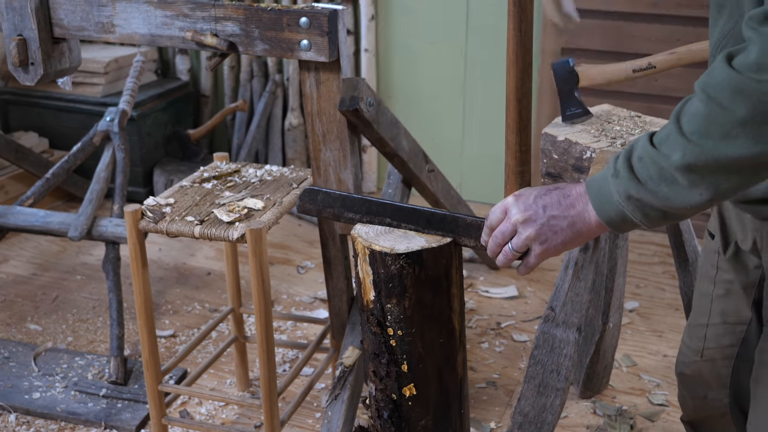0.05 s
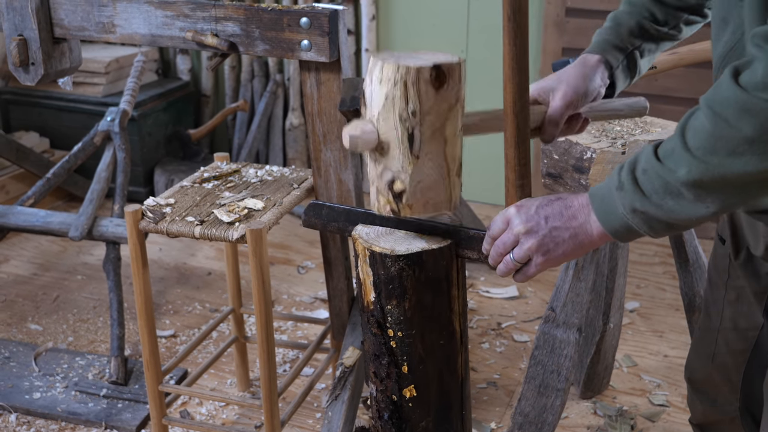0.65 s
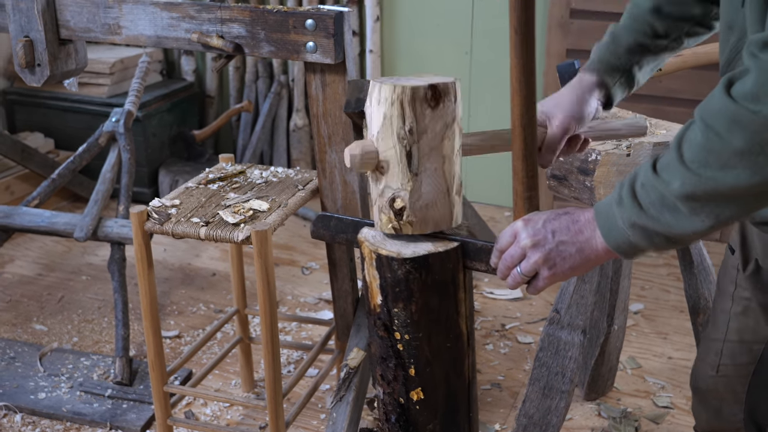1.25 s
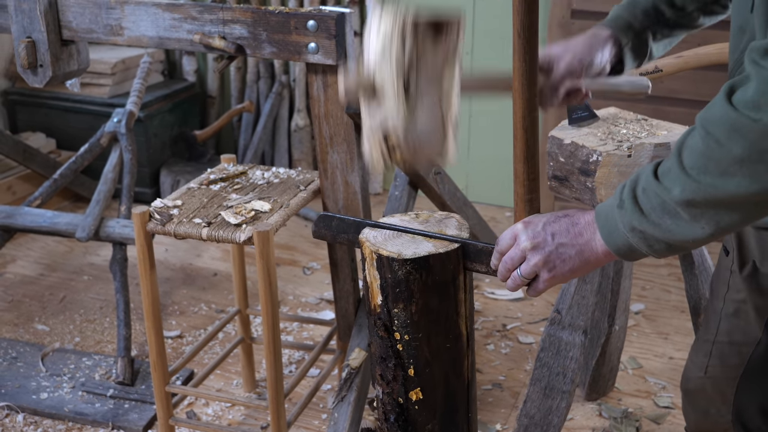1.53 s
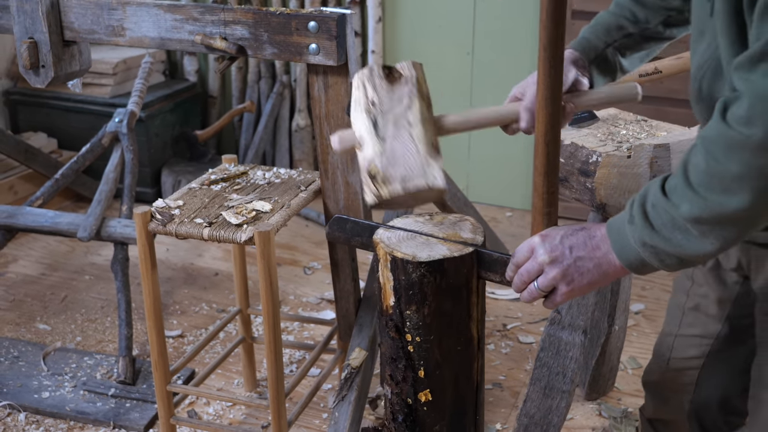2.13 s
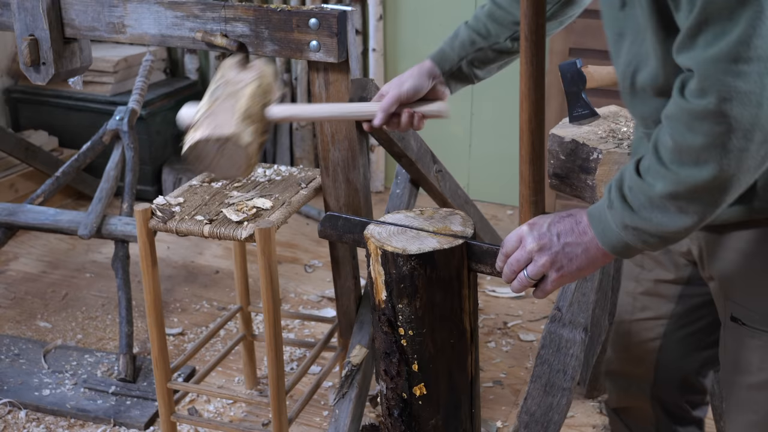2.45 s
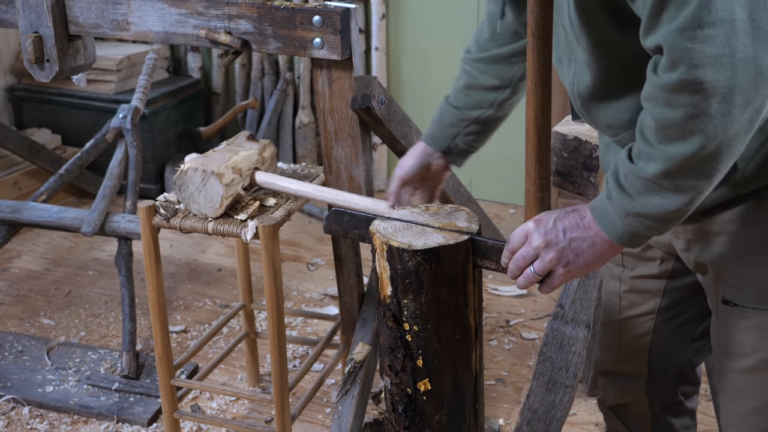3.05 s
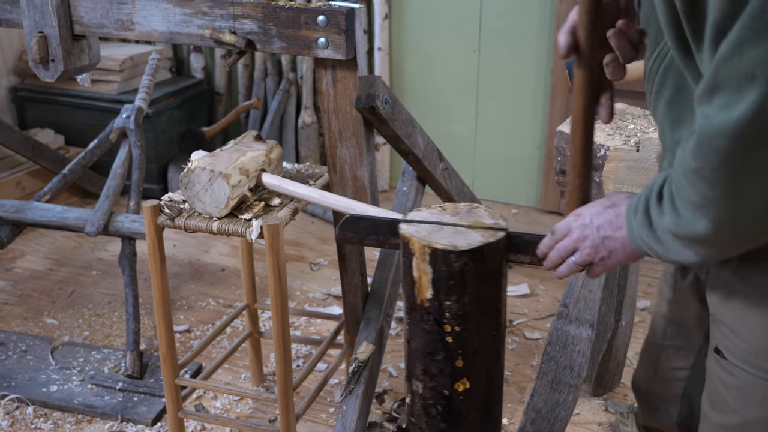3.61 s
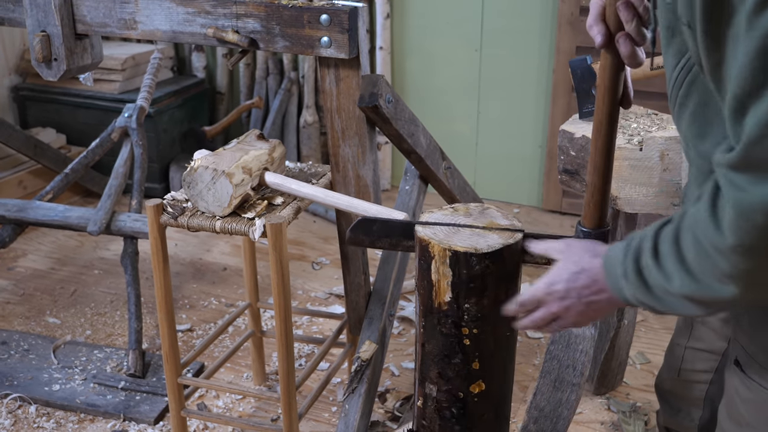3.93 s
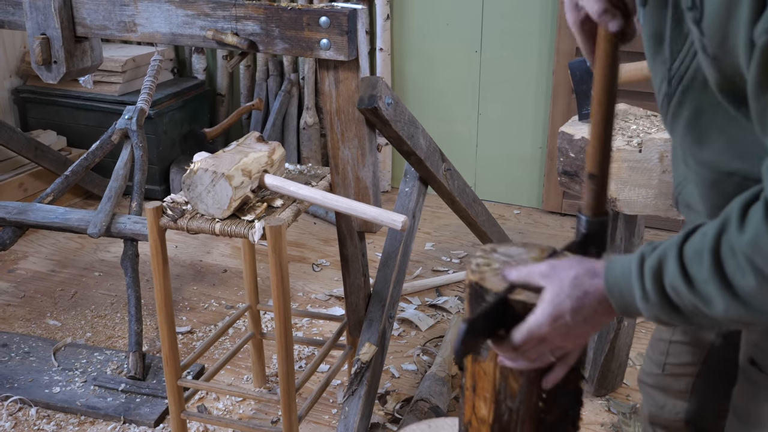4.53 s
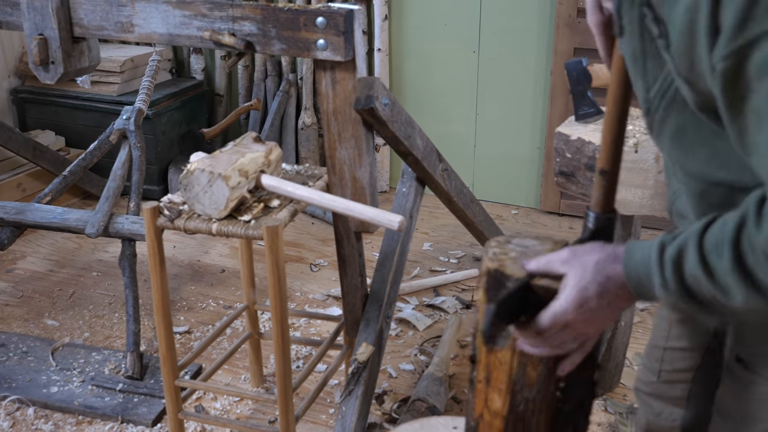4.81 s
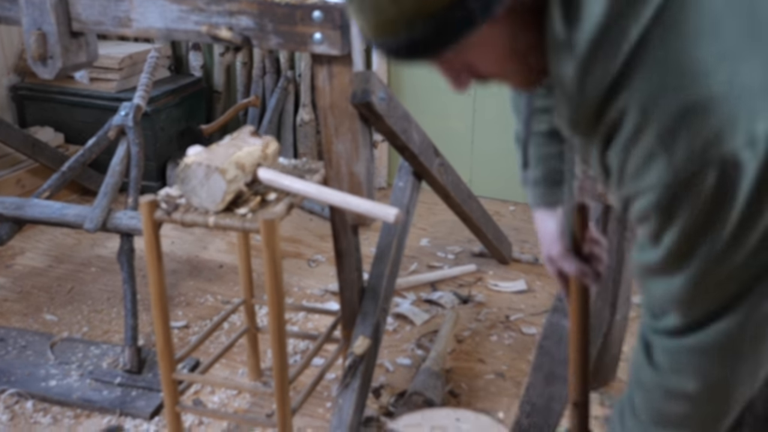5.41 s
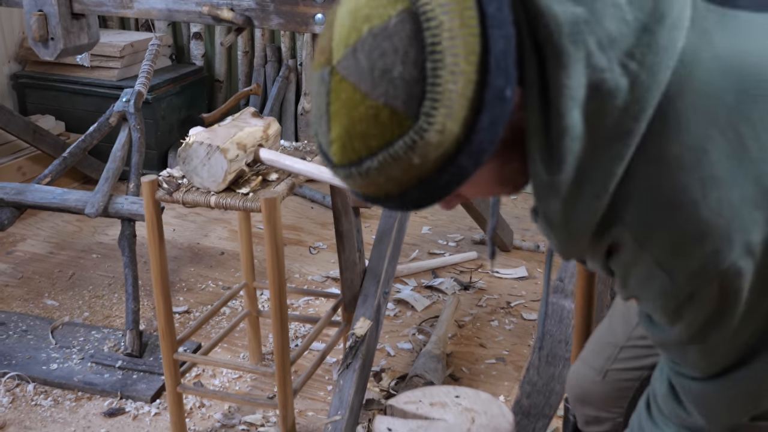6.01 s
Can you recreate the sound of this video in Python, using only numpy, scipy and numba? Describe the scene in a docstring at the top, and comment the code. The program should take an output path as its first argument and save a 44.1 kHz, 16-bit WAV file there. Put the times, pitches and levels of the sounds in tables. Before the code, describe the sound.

A wooden mallet drives a steel blade into a log three times; the log splits with a crack and lands with a boom.

```python
"""Three sharp knocks ring out in a workshop: a wooden mallet drives a steel froe into a green log.
Each impact excites the modes of blade and plank floor, and a limiter flattens its peak. The mallet
bumps to rest on a stool; the levered log fractures with a crack, and its halves boom on the planks.
Sleeves rustle by friction and dry shavings tick, while distant traffic swells and fades."""
import sys
import numpy as np
from scipy import signal
from scipy.fft import rfft, irfft, next_fast_len
from scipy.io import wavfile
from scipy.ndimage import map_coordinates
from numba import njit

SR = 44100
rng = np.random.default_rng(int(sys.argv[2]) if len(sys.argv) > 2 else 0)


def wav_out(sig):
    """Save sig, one row per channel (or a flat mono array), as 16-bit PCM at SR to the path in sys.argv[1]."""
    wavfile.write(sys.argv[1], SR, np.round(np.clip(np.atleast_2d(sig).T, -1, 1) * 32767).astype(np.int16))


N = 276507
AGE = np.arange(SR * 3 // 4) / SR  # time since an event began, t/s
BINS = np.fft.rfftfreq(len(AGE), 1 / SR)  # its frequency axis, f/Hz


# mallet blows: t/s, level/dB, blade depth (0-1), knock f/Hz, knock level/dB, bite level/dB,
# ring cut-off f/Hz
BLOW_EVENTS = [(0.5341, 25.5, 0.22, 1220, 11, -2, 9000), (1.2958, 15.5, 0, 1320, 9.5, -16, 2980),
               (1.9695, 12.5, 1, 600, 12, -12.5, 6930)]
def mallet_blows(floor_lag_s=0.0126):
    """Mechanical coupling: the deeper the blade sits, the less it rings and the more the floor thuds."""
    out = np.zeros(N)
    for s, db, depth, knock_hz, knock_db, bite_db, ring_hz in BLOW_EVENTS:
        strike = impact(depth, knock_hz, knock_db, bite_db)
        blade = amp(at_depth(depth, -12, -25.5)) * blade_ring(ring_hz)
        thud = amp(at_depth(depth, -23, -15)) * floor_boom(contact_hz=at_depth(depth ** 2, 32, 226))
        thud = np.pad(thud, (round(floor_lag_s * SR), 0))[:len(AGE)]  # the heavy floor answers late
        add(out, s, amp(db) * room(strike + blade + thud, wet_db=-7.5))
    return out


# spectra of the mallet's crack and of the edge biting into fibres: f/Hz, level/dB
CRACK_SPECTRUM = [(120, -34), (210, -21), (300, -4), (420, 3.5), (750, 4.5), (1030, 4), (1400, 2),
                  (1850, 6), (2350, -18), (3000, -6.5), (4500, -15), (6500, -23.5), (8700, -8),
                  (10500, -20.5), (14000, -12.5), (16000, -31)]
BITE_SPECTRUM = [(800, -4), (2200, 1), (2900, 5), (3700, 3.5), (4450, 7.5), (5200, 2.5), (6500, -2.5),
                 (9000, -15), (11000, -22), (16000, -42)]
def impact(depth, knock_hz, knock_db, bite_db):
    """A brief force has a broad spectrum: crack, knock and bite add in power."""
    crack = amp(-1 + along(CRACK_SPECTRUM, BINS))
    width_hz = at_depth(depth, 220, 750)  # damping by the log broadens the knock
    knock = amp(knock_db) * resonance(knock_hz, width_hz) ** 2
    bite = amp(bite_db + along(BITE_SPECTRUM, BINS))
    return burst(np.sqrt(crack ** 2 + knock ** 2 + bite ** 2), t60=0.026)


# modes of the steel blade: f/Hz, level/dB, T60/s
BLADE_MODES = [(1174, -2.5, 0.086), (1268, -10, 0.076), (1328, 2.5, 0.031), (1330, -35, 0.052),
               (1568, -5, 0.029), (1931, 2.5, 0.038), (3130, -10, 0.17), (4170, -0.5, 0.042),
               (4510, -4.5, 0.06), (4740, -6.5, 0.044), (5800, -53, 0.17)]
def blade_ring(cutoff_hz):
    """Free vibration: the struck blade rings in inharmonic modes, damped by the log."""
    return soften(ring(BLADE_MODES, scatter_db=2.5), cutoff_hz)


# modes of the plank floor with the log on it: f/Hz, level/dB, T60/s
FLOOR_MODES = [(40.4, -9.5, 0.4), (74.5, -9, 0.19), (104.4, 2, 0.14), (117, -3, 0.16), (150.4, -2.5, 0.16),
               (205, 0.5, 0.077), (259.5, -1.5, 0.058), (345.5, 1.5, 0.044), (465, -0.5, 0.035),
               (610, -20.5, 0.025), (830, -7.5, 0.1), (1310, -3, 0.012)]
def floor_boom(contact_hz):
    """Modal response: the planks boom in the low modes that the contact can excite."""
    return soften(ring(FLOOR_MODES, scatter_db=0.5), contact_hz)


# fibres snapping: t/s, level/dB, T60/s
FIBRE_SNAPS = [(4.6051, -3.5, 0.014), (4.613, -37, 0.76), (4.714, -30, 0.26), (4.7336, -25.5, 0.037),
               (4.743, -24, 0.072)]
# spectrum of tearing wood: f/Hz, level/dB
FIBRE_SPECTRUM = [(250, -3), (800, 7), (1230, 11), (1500, -8), (1900, 5), (2700, 0), (4500, -2.5),
                  (6500, -4.5), (9000, -5.5), (10500, -12), (16000, -17)]
def splitting():
    """Fracture releases strain energy: one crack, then the last fibres tear in a spiky crackle."""
    out = np.zeros(N)
    for s, db, t60 in FIBRE_SNAPS:
        spikes = unit(amp(5.0 * wobble(770)[:len(AGE)]))
        add(out, s, amp(db) * fade(t60) * spikes * noise(FIBRE_SPECTRUM, len(AGE)))
    return room(out, wet_db=-5.0)


# the log, its halves and a heavy step on the floor: t/s, level/dB, contact cut-off f/Hz, bounces
FLOOR_CONTACTS = [(4.602, -15, 850, 0), (4.614, -6, 172, 0), (4.747, -24.5, 600, 0), (4.802, -20, 483, 0),
                  (5.151, -29.5, 400, 0), (5.234, -30, 111, 0), (5.5005, 0.5, 480, 2), (6.019, -31, 99, 0)]
# spectrum of wood hitting wood: f/Hz, level/dB
CLACK_SPECTRUM = [(200, 2), (600, 17), (1300, 4.5), (2500, -6.5), (6000, -17.5), (16000, -39)]
def floor_knocks(joist_hz=30.1, soft_contact_hz=143.5):
    """Contact time sets the timbre: a harder landing clacks more and sways the joists less."""
    out = np.zeros(N)
    for *landing, bounces in FLOOR_CONTACTS:
        for s, db, contact_hz in bouncing(*landing, flight_s=0.093, loss_db=12, count=bounces):
            hardness = np.log2(contact_hz / soft_contact_hz)  # in octaves
            boom = floor_boom(contact_hz)
            clack = amp(-25.5 + 9 * hardness) * burst(amp(along(CLACK_SPECTRUM, BINS)), t60=0.054)
            sway = amp(-5.5 - 9 * hardness) * np.sin(2 * np.pi * joist_hz * AGE) * fade(t60=1)
            add(out, s, amp(db) * (room(boom + clack, wet_db=-4.0) + sway))
    return out


# the mallet bumping onto the stool: t/s, level/dB, contact cut-off f/Hz
STOOL_BUMPS = [(2.879, -17, 230), (2.925, -17, 415), (2.982, -18, 300)]
# modes of the stool's frame: f/Hz, level/dB, T60/s
STOOL_MODES = [(55, -13, 0.36), (79, -16, 0.14), (113, -14.5, 0.177), (148, -5, 0.089), (210, -0.5, 0.1),
               (295, -1, 0.078), (379, -1, 0.06), (530, -2.5, 0.077)]
def mallet_laid_down():
    """Inelastic impacts: the head rocks to rest on the woven seat, exciting the frame's modes."""
    out = np.zeros(N)
    for bump in STOOL_BUMPS:
        for s, db, contact_hz in bouncing(*bump, flight_s=0.027, loss_db=11, count=1):
            frame = soften(ring(STOOL_MODES, scatter_db=4.0), contact_hz)
            add(out, s, amp(db) * room(frame, wet_db=-0.5))
    return out


# sleeves and shoes brushing, and one sole scuffing the shavings: peak t/s, level/dB, half-width t/s
BRUSH_STROKES = [(0.005, -42.5, 0.04), (2.54, -43, 0.032), (2.88, -41, 0.09), (3.38, -34.5, 0.016),
                 (3.7, -43.5, 0.21), (5.16, -38.5, 0.026), (5.33, -36.5, 0.02), (6.14, -37.5, 0.08)]
SOLE_SCUFF = (6.16, -41.5, 0.031)
# spectra of the cloth and of the sole: f/Hz, level/dB
CLOTH_SPECTRUM = [(400, -21), (1500, 4.5), (5500, -1.5), (7000, -5.5), (9000, -1.5), (10200, -10.5),
                  (13000, -7), (16000, -14)]
SOLE_SPECTRUM = [(3000, -40), (4900, -24), (5650, 0), (6500, -16), (10000, -40)]
def rustle():
    """Friction noise: rubbing surfaces give a grainy hiss that swells with each movement."""
    fidgets = amp(-58 + 5 * wobble(4.78))  # faint stirring between strokes
    strokes = swells(BRUSH_STROKES) + fidgets
    cloth = unit(noise(CLOTH_SPECTRUM, N) * amp(3 * wobble(300)))
    sole = unit(noise(SOLE_SPECTRUM, N) * amp(4.4 * wobble(120)))
    return amp(-4.5) * strokes * cloth + swells([SOLE_SCUFF]) * sole


# the louder chips ticking: t/s, level/dB, centre f/Hz
CHIP_TICKS = [(0.1078, -28, 1830), (1.6031, -29, 6400), (2.2393, -21, 8300), (2.386, -30.5, 5060),
              (2.4771, -28, 2750), (2.531, -19.5, 9200), (2.588, -28.5, 8450), (3.469, -25.5, 14000),
              (5.123, -25.5, 8200), (6.0377, -21, 6950), (6.127, -19.5, 4940)]
def shavings(relative_bandwidth=0.74, decay_cycles=67):
    """Constant-Q resonance: chips die away in equal numbers of cycles, so bigger ones ring longer."""
    out = np.zeros(N)
    crumbs = [(when * N / SR, -45 + 8 * (size - .5), 7960 * 2 ** (pitch - .5))  # faint, falling at random
              for when, size, pitch in rng.random(size=(12, 3))]
    for s, db, centre_hz in CHIP_TICKS + crumbs:
        spectrum = resonance(centre_hz, relative_bandwidth * centre_hz)
        add(out, s, amp(db) * burst(spectrum, t60=decay_cycles / centre_hz))
    return out


# far cars passing: nearest t/s, level/dB, half-width t/s
CAR_PASSES = [(0.3, -38.5, 0.87), (3.7, -34.5, 0.67), (5.5, -36, 1)]
# spectra of tyre roar and outdoor rumble: f/Hz, level/dB
TYRE_SPECTRUM = [(100, -9), (160, -12), (240, -9), (450, -8.5), (720, -2.5), (1000, 0), (1300, -9),
                 (1850, -16), (2500, -14.5), (3600, -23), (6800, -32.5), (8700, -37.5), (10000, -50),
                 (16000, -45)]
RUMBLE_SPECTRUM = [(12, 5), (28, 11), (55, -6), (105, -14), (160, -17), (400, -48)]
def traffic(road_db=-51, rumble_db=-43):
    """Geometric spreading: tyre roar swells as each car nears, over a far road and a low rumble."""
    passes = amp(road_db) + swells(CAR_PASSES)
    tyres = passes * amp(0.24 * wobble(16)) * noise(TYRE_SPECTRUM, N)
    rumble = amp(rumble_db + 2.1 * wobble(8.6)) * noise(RUMBLE_SPECTRUM, N)
    return tyres + rumble


# reverberation time of the workshop: f/Hz, T60/s
ROOM_DECAY = [(60, 0.61), (200, 0.77), (600, 0.56), (1400, 0.68), (4000, 0.57), (8000, 0.5), (15000, 0.26)]
def room(x, wet_db, build_s=0.00067):
    """Reverberation: a diffuse tail follows the direct sound and is absorbed first in the treble."""
    hz, t, spectra = signal.stft(rng.standard_normal(len(AGE)), SR, nperseg=256)
    decay = np.exp(-np.log(1000) * t / along(ROOM_DECAY, hz)[:, None])
    tail = signal.istft(spectra * decay, SR, nperseg=256)[1][:len(AGE)]
    tail *= 1 - np.exp(-AGE / build_s)
    return x + amp(wet_db) * signal.fftconvolve(x, tail / np.linalg.norm(tail))[:len(x)]


def ring(modes, scatter_db):
    """Modal superposition: damped sines, whose shares of the energy vary from strike to strike."""
    return sum((-1) ** k * amp(db + scatter_db * rng.standard_normal())
               * fade(t60) * np.sin(2 * np.pi * hz * AGE)
               for k, (hz, db, t60) in enumerate(modes))


def burst(gain, t60):
    """A transient: decaying noise, its spectrum flattened and then shaped by the gain."""
    spectrum = rfft(rng.standard_normal(len(AGE)) * fade(t60))
    x = irfft(spectrum / np.abs(spectrum) * gain, len(AGE)) * fade(10 * t60)
    return x * np.linalg.norm(fade(t60)) / np.linalg.norm(x)


def resonance(centre_hz, width_hz):
    """Magnitude response of a damped oscillator."""
    return BINS * width_hz / np.hypot(centre_hz ** 2 - BINS ** 2, BINS * width_hz)


def soften(x, hz):
    """A long, soft contact acts as a low-pass filter."""
    return signal.sosfilt(signal.butter(2, min(hz, SR / 3), fs=SR, output="sos"), x)


def bouncing(s, db, contact_hz, flight_s, loss_db, count, softening=0.51):
    """Restitution: a contact and its ever weaker, softer rebounds, as t/s, level/dB, cut-off f/Hz."""
    return [(s + k * flight_s, db - k * loss_db, contact_hz * softening ** k) for k in range(count + 1)]


def at_depth(depth, surface, buried):
    """Linear interpolation between the blade on the surface (0) and buried (1)."""
    return np.interp(depth, [0, 1], [surface, buried])


def swells(rows):
    """An envelope of Lorentzian peaks, one for each row."""
    t = np.arange(N) / SR
    return sum(amp(db) / (1 + ((t - s) / width) ** 2) for s, db, width in rows)


def noise(spectrum, size):
    """Coloured noise of rms 1."""
    m = next_fast_len(size)
    gain = amp(along(spectrum, np.fft.rfftfreq(m, 1 / SR)))
    return unit(irfft(rfft(rng.standard_normal(m)) * gain, m)[:size])


def wobble(rate):
    """Smooth random modulation, rate knots a second."""
    knots = rng.standard_normal(int(N * rate / SR) + 4)
    return map_coordinates(knots, [np.arange(N) * rate / SR])


def fade(t60):
    """Exponential decay, 60 dB in t60 seconds."""
    return np.exp(-np.log(1000) * AGE / t60)


def along(points, hz):
    """Interpolation on a logarithmic frequency axis."""
    f, values = np.transpose(points)
    return np.interp(np.log(hz + 1), np.log(f), values)


def amp(db):
    """Level to amplitude ratio."""
    return 10 ** (np.asarray(db) / 20)


def unit(x):
    """Normalisation to rms 1."""
    return x / np.sqrt(np.mean(x ** 2) + 1e-20)


def add(track, s, sound):
    """Superpose a sound on the track at time s."""
    part = track[round(s * SR):][:len(sound)]
    part += sound[:len(part)]


@njit
def gain_reduction(excess_db, attack, release):
    """Attack and release: the cut in dB chases each overshoot, then recovers at a steady rate."""
    out, cut = np.zeros(len(excess_db)), 0.
    for i in range(len(excess_db)):
        if excess_db[i] > cut:
            cut += (excess_db[i] - cut) * attack
        else:
            cut = max(cut - release, 0.)
        out[i] = cut
    return out


def scene():
    """Linear superposition: all sources sum at one point, alike in both channels."""
    mono = mallet_blows() + mallet_laid_down() + splitting() + floor_knocks()
    mono += room(rustle() + shavings(), wet_db=-6.5)
    mono += traffic()
    return np.array([mono, mono])


def record(dry, threshold_db=-4.5, attack_s=0.0016, release_db_per_s=58, ceiling=0.76, top_hz=15900):
    """Peak limiting: the first milliseconds clip, and the recovering gain holds up the room's tail."""
    excess_db = 20 * np.log10(np.abs(dry[0]) + 1e-9) - threshold_db
    x = dry * amp(-gain_reduction(excess_db, 1 / (attack_s * SR), release_db_per_s / SR))
    x = x / (1 + np.abs(x / ceiling) ** 6) ** (1 / 6)  # soft clipping
    x = signal.sosfilt(signal.butter(1, 13000, fs=SR, output="sos"), x)  # gentle treble roll-off
    m = next_fast_len(N + SR // 2)
    passband = np.fft.rfftfreq(m, 1 / SR) < top_hz
    return irfft(rfft(x, m) * passband, m)[:, :N]


dry = scene()
out = record(dry)
wav_out(out)
```